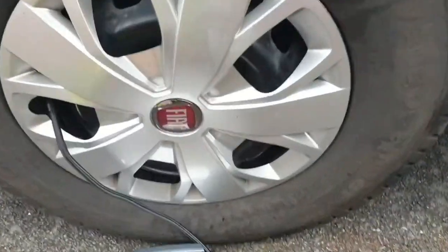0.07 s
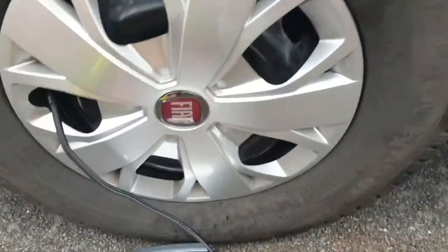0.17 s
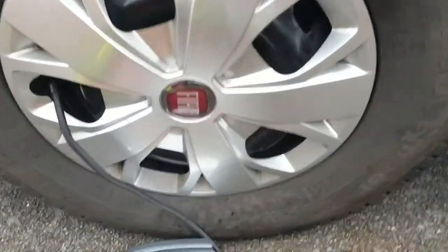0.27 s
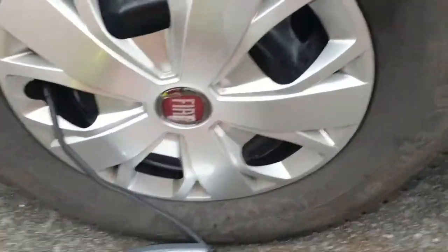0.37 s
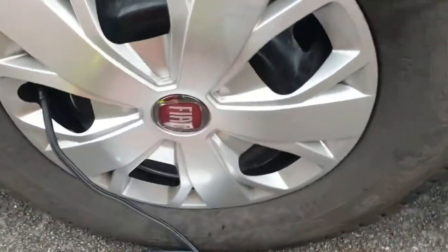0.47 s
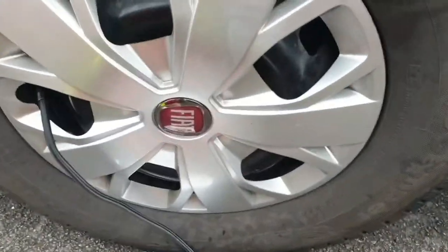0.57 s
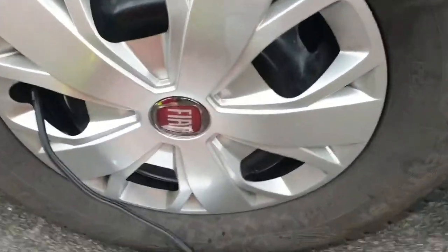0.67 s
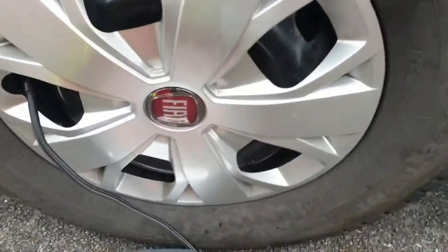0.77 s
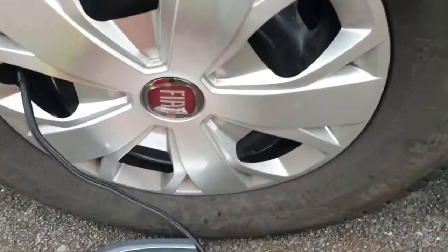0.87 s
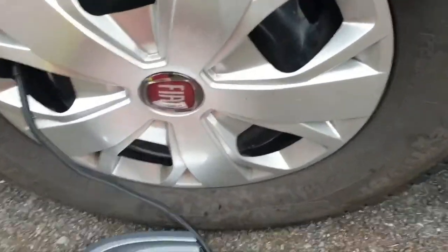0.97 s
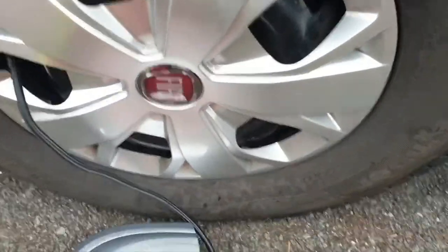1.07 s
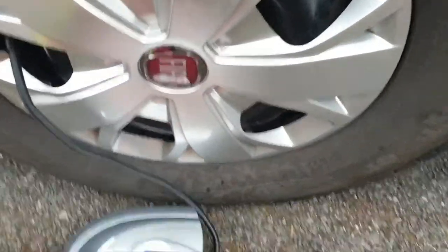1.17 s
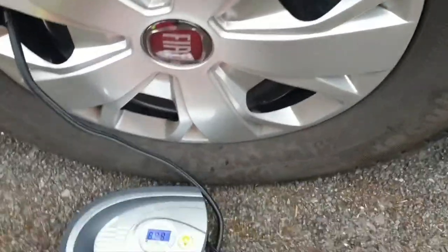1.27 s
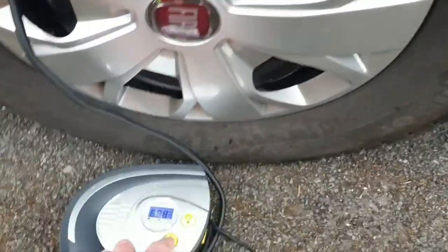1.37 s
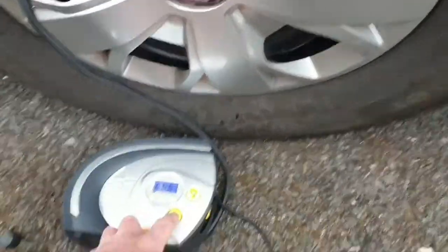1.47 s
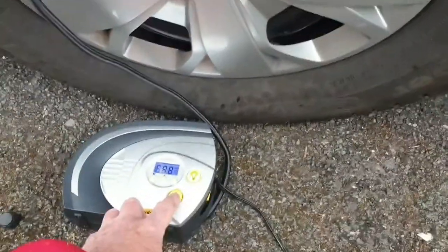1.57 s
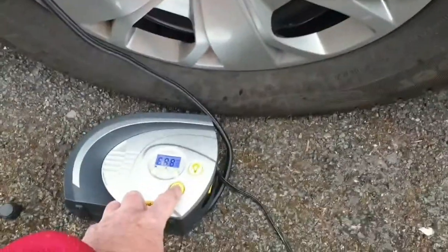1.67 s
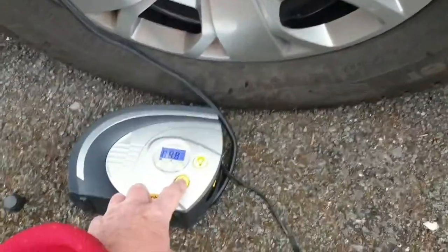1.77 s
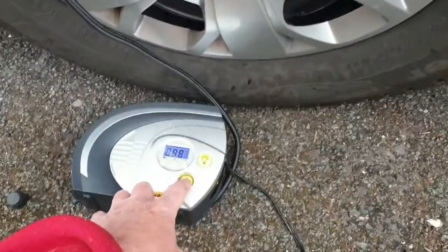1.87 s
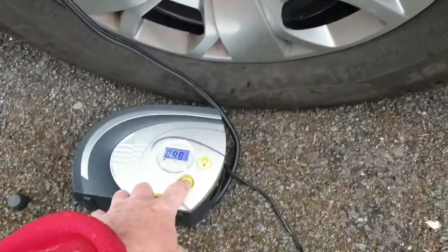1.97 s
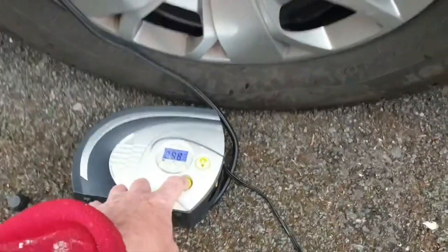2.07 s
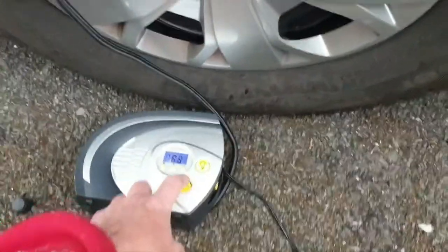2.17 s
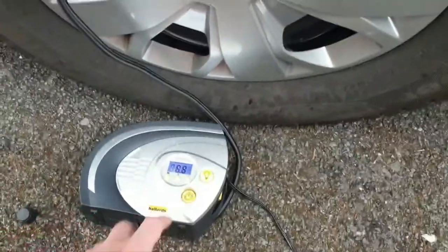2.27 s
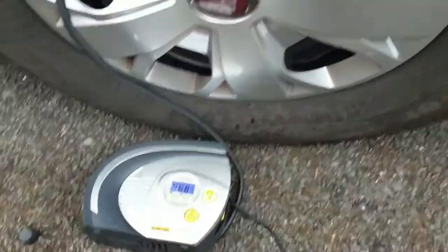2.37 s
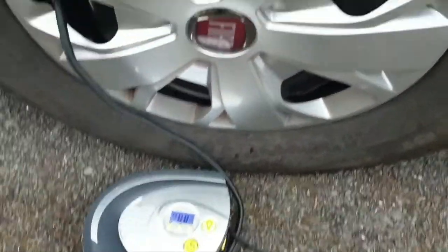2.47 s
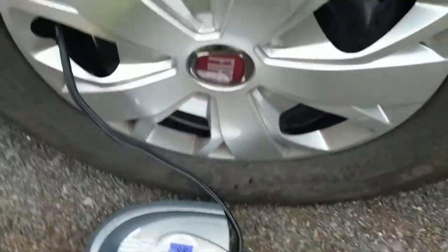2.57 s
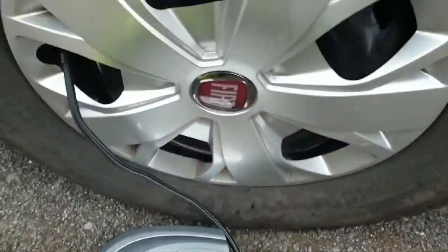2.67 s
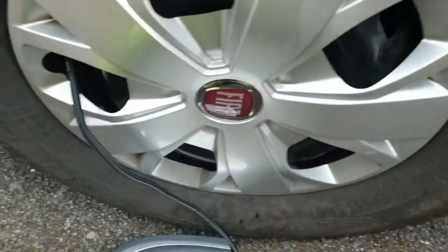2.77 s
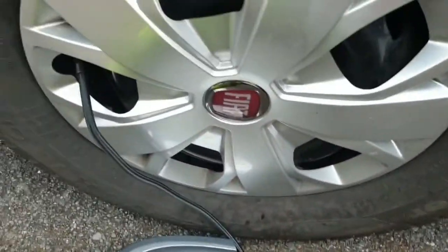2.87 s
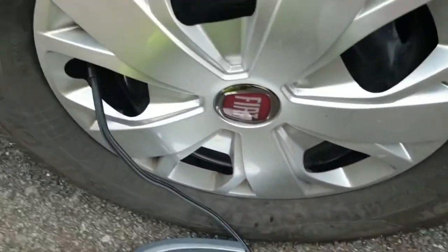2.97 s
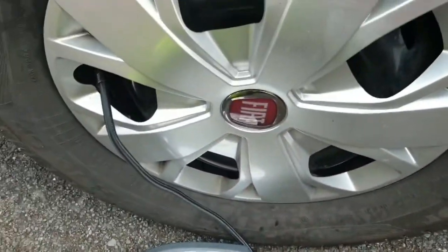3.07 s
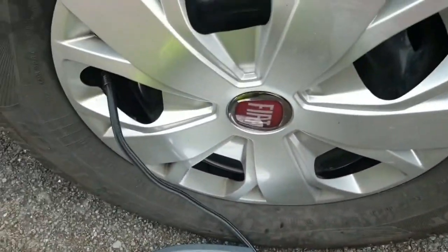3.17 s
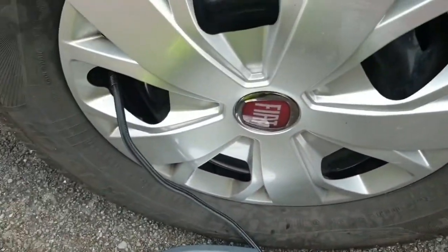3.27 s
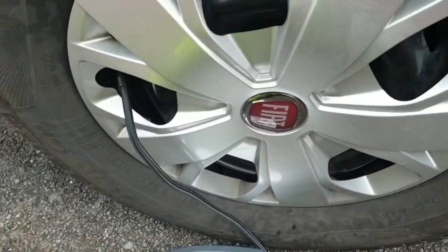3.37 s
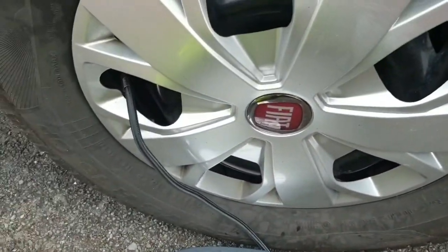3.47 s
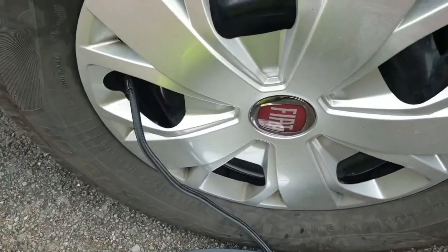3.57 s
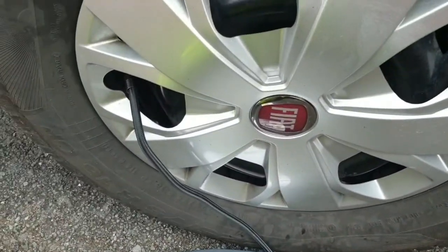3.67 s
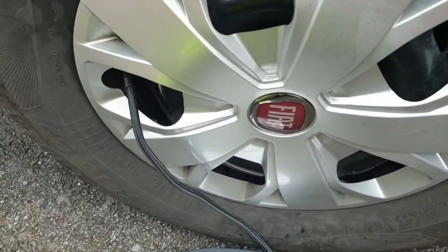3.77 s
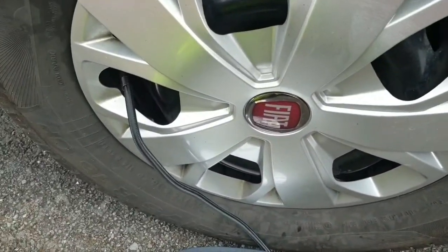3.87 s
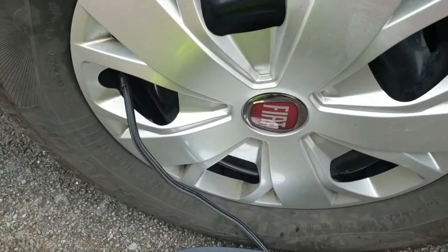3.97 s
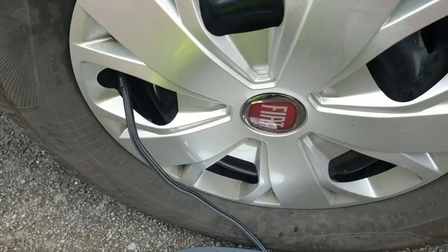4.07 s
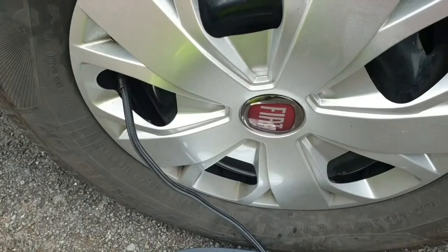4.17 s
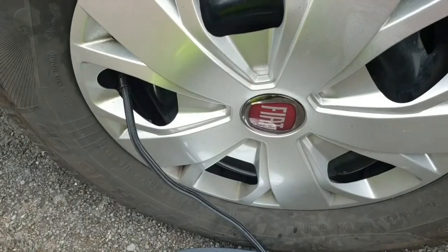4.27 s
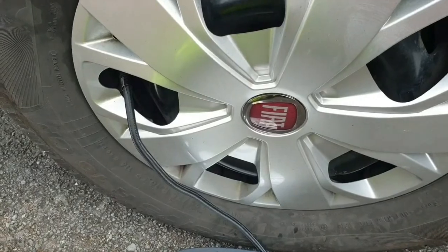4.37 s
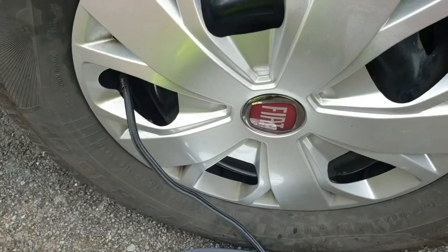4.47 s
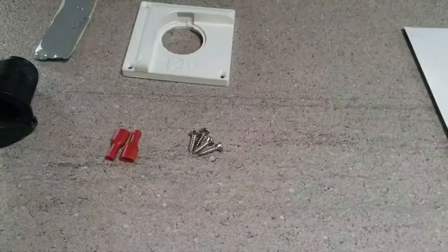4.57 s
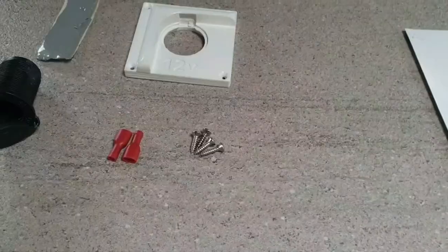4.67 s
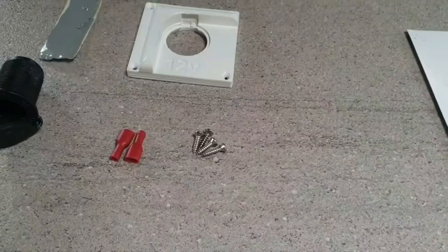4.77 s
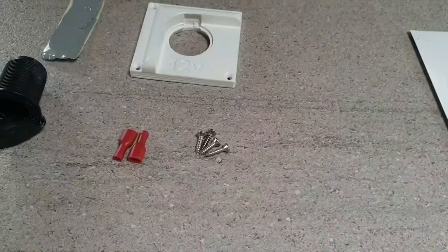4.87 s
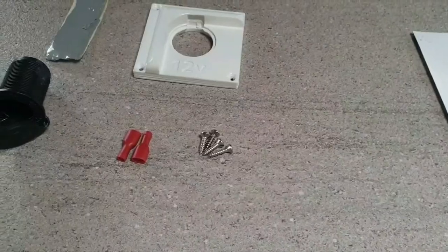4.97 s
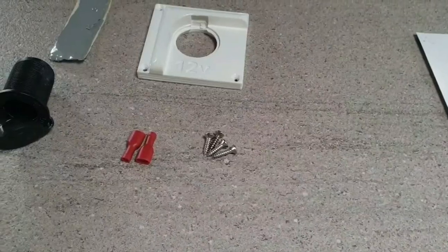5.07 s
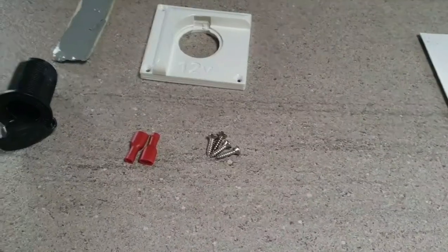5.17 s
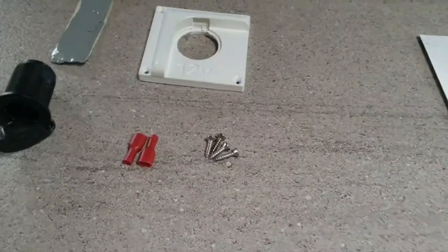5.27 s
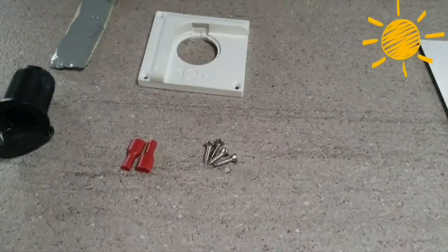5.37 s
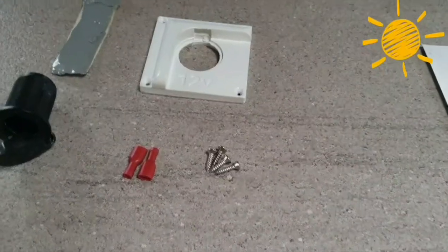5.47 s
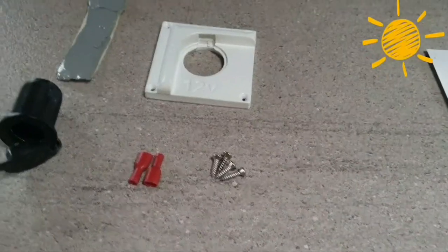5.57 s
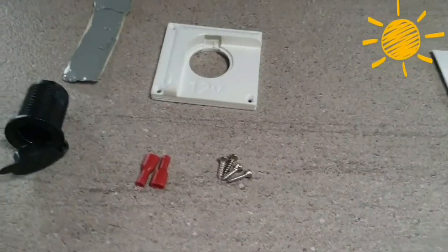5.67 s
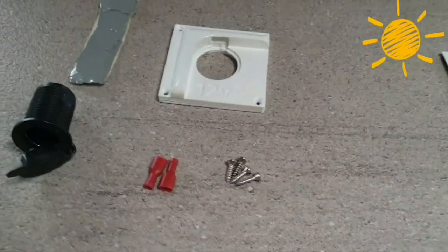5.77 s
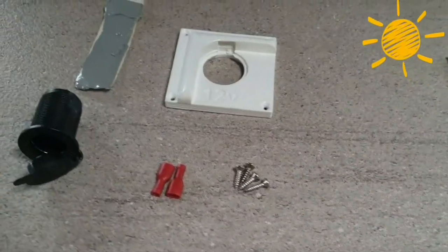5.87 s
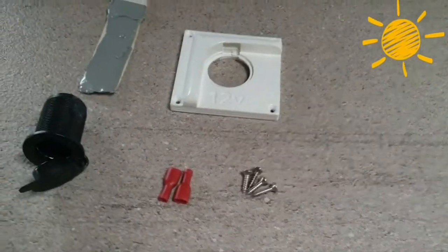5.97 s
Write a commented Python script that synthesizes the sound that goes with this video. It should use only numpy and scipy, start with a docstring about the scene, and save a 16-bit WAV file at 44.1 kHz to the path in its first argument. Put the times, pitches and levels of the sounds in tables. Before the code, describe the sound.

Outdoors, a few soft gritty scuffs on asphalt and dull microphone bumps sit over distant traffic rumble and very faint birds. About two seconds in, a portable tyre inflator starts with hard knocks and quickly reaches a loud, steady, rattling buzz, close to a hand-held stereo microphone. After a little over three seconds it cuts off together with the street sound, leaving faint room hiss.

```python
"""Tyre inflator at the roadside

A small piston inflator on asphalt beside a car wheel, close to a hand-held stereo microphone, with
traffic and faint birds far off. After a few scuffs it is switched on, knocks and runs up to 39 strokes
a second: each turn thumps the plastic case, buzzes the valve and rattles piston, gears and loose parts.
The street sound ends abruptly, leaving only the faint hiss of a quiet room."""
import sys
import numpy as np
from scipy import signal
from scipy.fft import rfft, irfft, next_fast_len
from scipy.io import wavfile
from scipy.ndimage import uniform_filter1d

SR = 44100
rng = np.random.default_rng(int(sys.argv[2]) if len(sys.argv) > 2 else 0)


def bounce(signal):
    """Save signal as a 16-bit WAV file at the path given by the first command-line argument."""
    frames = np.transpose(np.atleast_2d(signal))
    limited = np.clip(frames, -1, 1)
    pcm = np.round(limited * 32767).astype(np.int16)
    wavfile.write(sys.argv[1], SR, pcm)


N = 265041
TIME = np.arange(N) / SR

START_S, STOP_S, FULL_TURNS_PER_S = 2.0852, 5.426, 39
THUMP_DB, CLATTER_DB, GEAR_DB, DB_PER_DOUBLED_SPEED = -22.5, -22, -31, 3.5   # base levels at full speed
STRAIN_S, STRAIN_THUMP_DB, ROCKING_DB = 0.55, 3.5, -23.5   # the strain of running up dies away
THUMP_SAG_DB_PER_S, RATTLE_WANDER_DB = 1.02, 0.94
SCUFF_ATTACK_S, SCUFF_RELEASE_S, SCUFF_TAIL_DB, SCUFF_TAIL_S = 0.014, 0.044, -15, 0.28
TRAFFIC_DB, TRAFFIC_FADE_DB_PER_S, HUM_DB, HUM_FADE_DB_PER_S = -42.5, 1.43, -46, 11
ROOM_DB, ROOM_FADE_DB_PER_S, FLUTTER_S = -60, 6, 0.014
PEAK_LIMIT, CUTOFF_HZ = 1.05, 14600

# speed of the crank: time_s, turns_per_s
CRANK_SPEED = [(2.085, 21.69), (2.14, 31.73), (2.2, 35.82), (2.3, 38.71), (2.5, 38.7), (3.0, 39.02),
               (3.9, 38.81), (4.4, 38.89), (4.9, 38.63), (5.43, 38.93)]
# modes of case and feet, rung by each stroke: pitch_hz, width_hz, gain_db, polarity
CASE_MODES = [(79.6, 33, -10.5, -1), (169.3, 78, 0.5, -1), (267, 18, -2.5, -1), (309.9, 6.7, 2.5, 1),
              (376, 18, -4, 1), (437.2, 15, 4, 1), (528.3, 28, 5, 1), (581.6, 22, 0, -1),
              (735.7, 16, 2.5, -1), (819, 13.3, -10.5, 1), (1140, 17, -4.5, 1)]
# modes of the case rocking on its feet: pitch_hz, width_hz, gain_db
ROCKING_MODES = [(358, 50, 1), (421, 13, 13), (547, 23, -9), (734, 32, -2)]
# contacts within one turn of the crank: place_turns, half_length_turns, gain_db
VALVE_CONTACTS = [(.85, 0.11, -4), (.14, 0.037, -3.5), (0, 0.037, -21.5), (.57, 0.15, -6),
                  (0.6, 0.098, -11.5)]
PISTON_CONTACTS = [(.06, 0.045, 0.5), (0.152, 0.015, -2), (.41, .05, -0.5), (0.549, 0.052, -5)]
GEAR_CONTACTS = [(0.069, 0.02, 1.5), (.43, 0.057, -1), (.59, .04, -16), (.68, 0.053, 0)]
# resonances of valve, shell and gears: pitch_hz, width_hz, gain_db
VALVE_MODES = [(2420, 90, -9.5), (2413, 62, -0.5), (2550, 90, -11.5), (2570, 64, 6.5)]
SHELL_MODES = [(1023, 40, -10), (1196, 31, 6.5), (1528, 84, -0.5), (1850, 180, -3.5), (2815, 150, -2.5),
               (3216, 390, 1), (7416, 286, 5.5), (9640, 1200, -4), (13920, 220, -6.5)]
GEAR_MODES = [(4384, 70, 11.5), (4690, 230, 9), (5010, 280, 2.5), (5260, 69, -2), (5940, 160, 1),
              (6460, 410, 5), (6950, 400, -15)]
# how strongly the valve rings: time_s, level_db
VALVE_LEVELS = [(2.1, -24.5), (2.13, -26), (2.25, -23.5), (2.62, -27), (2.65, -21), (2.76, -26.5),
                (2.86, -22), (3.23, -26), (3.97, -26), (4.15, -30), (4.69, -27.5), (5.38, -27)]
# spectrum of the piston clatter: frequency_hz, density_db
CLATTER_SPECTRUM = [(60, -17), (200, -8.5), (450, 3), (880, -0.5), (1400, -5), (2000, -2.5), (2800, -7.5),
                    (3800, -9), (5000, -1.5), (6000, -12), (7700, -12.5), (8900, -21), (10500, -13),
                    (14500, -24.5)]
# parts that buzz once a turn: start_s, end_s, place_turns, half_length_turns, pitch_hz, width_hz, level_db
LOOSE_BUZZES = [(2.093, 2.616, 0.07, 0.2, 3290, 120, -32), (2.1, 2.454, 0.43, 0.17, 962, 50, -30.5),
                (2.152, 2.544, 0.34, 0.09, 5060, 150, -44), (2.54, 2.68, 0.06, 0.088, 7300, 2500, -35.5),
                (2.8, 4.068, 0.23, 0.15, 2980, 350, -31.5), (3.973, 4.113, 0.56, .3, 6520, 200, -33),
                (4.056, 4.885, 0.55, 0.096, 4400, 250, -32), (4.06, 4.9, 0.34, 0.27, 1180, 150, -35),
                (4.06, 5.5, 0.05, 0.035, 4910, 400, -34), (4.075, 5.5, 0.8, 0.16, 5293, 160, -31.5),
                (4.656, 5.5, 0.06, 0.07, 7250, 600, -37), (4.5, 5.37, 0.71, 0.08, 2434, 90, -29.5)]
# knocks at switch-on: start_s, level_db, decay_s
START_JOLTS = [(2.0473, -26.5, 0.053), (2.05, -18.5, .003), (2.076, -24.5, 0.0098), (2.0877, -12.5, 0.003),
               (2.104, -16.5, 0.013), (2.1232, -8.5, 0.0012), (2.1261, -8.5, 0.0075), (2.136, -15, 0.0047)]
# spectrum of those knocks: frequency_hz, density_db
JOLT_SPECTRUM = [(100, -23), (400, 10.5), (1000, 1.0), (1600, 0.5), (2400, 2), (3800, -6),
                 (7500, -11.5), (14000, -20.5)]
# where the pump lies for the hand-held microphone: time_s, left_minus_right_db
PUMP_BEARING = [(2.15, 1.2), (4.0, 1), (4.2, 1.9), (5.4, 1.5)]
# colour of the two microphone ports: frequency_hz, left_minus_right_db
MIC_PORTS = [(80, 0), (300, 2.5), (750, -2.5), (1700, 3.5), (2400, -1), (3200, 3), (3900, -6.5), (4350, 3),
             (4900, -2.5), (5400, 7.5), (6100, -1), (8000, 3.5), (10800, -3.5), (14500, -6.5)]
# likeness of left and right: frequency_hz, correlation
MIC_LIKENESS = [(35, 0.97), (90, 0.64), (250, 1), (600, 0.58), (1200, 0.43), (2400, 0.2), (4000, 0.15),
                (7000, 0.075), (14000, 0.011)]
# gritty scuffs: start_s, length_s, body_db, hiss_db
GRIT_SCUFFS = [(0.0, 0.18, -54, -48), (0.165, 0.042, -55.5, -45), (0.241, 0.14, -46, -45.5),
               (0.418, 0.014, -43.5, -39), (0.519, 0.05, -50.5, -49.5), (0.673, 0.063, -55.5, -59)]
# spectra of a scuff's body and hiss: frequency_hz, density_db
SCUFF_BODY_SPECTRUM = [(300, -11.5), (600, 0), (1000, 0), (1600, -2.5), (2200, -9.5), (4000, -29.5)]
SCUFF_HISS_SPECTRUM = [(1000, -11.5), (2500, -1.5), (5000, -2), (7400, 1), (8800, -4.5), (14500, -3)]
# handling ticks: start_s, level_db, pitch_hz, width_hz
HANDLING_TICKS = [(1.033, -54.5, 8000, 7000), (1.702, -60, 1700, 1800)]
# dull bumps on the microphone: start_s, level_db, pitch_hz
MIC_BUMPS = [(0.709, -25, 101), (0.829, -28, 68), (1.336, -35, 60)]
# spectra of distant traffic and of the quiet room: frequency_hz, density_db
TRAFFIC_SPECTRUM = [(20, -47.5), (38, 1), (60, 0), (110, -3), (190, -12), (275, -6), (380, -14), (500, -17),
                    (850, -26.5), (2000, -40.5), (4500, -51), (7200, -43), (8800, -54), (14000, -47.5)]
ROOM_SPECTRUM = [(18, -57), (30, -16), (63, -7.5), (446, -13), (1040, -8.5), (1130, -15), (1250, -7),
                 (1530, -18), (3070, -12), (3580, -16), (4400, -31), (7550, -25), (9520, -37.5),
                 (14000, -23.5)]
# low hums of the street: pitch_hz, width_hz, gain_db
STREET_HUMS = [(264, 61, -1.5), (414, 40, -2)]
# far bird calls: start_s, length_s, start_hz, end_hz, level_db
BIRD_CALLS = [(1.167, 0.12, 3500, 3200, -73), (1.17, 0.1, 6700, 6300, -72), (1.5, .1, 6500, 6130, -71),
              (1.817, .06, 7050, 7100, -64), (1.868, 0.048, 4730, 5070, -68),
              (2.03, 0.023, 5100, 4600, -65)]
# treble swells in the room: peak_s, level_db
ROOM_FLUTTERS = [(5.48, -56), (5.55, -54), (5.607, -53.5), (5.68, -57.5), (5.75, -60.5), (5.84, -57),
                 (5.915, -57.5)]
# spectrum of those swells: frequency_hz, density_db
FLUTTER_SPECTRUM = [(1800, -23), (2800, 1), (3400, 4), (4300, -40)]


def inflator():
    """The pump, close up: one crank drives every part; thump, clatter and gears grow with its speed."""
    speed = in_time(CRANK_SPEED)
    turns = np.cumsum(speed) / SR
    turns -= np.interp(START_S, TIME, turns)   # counted from the first stroke
    run_s = np.maximum(TIME - START_S, 0)
    strain = np.exp(-run_s / STRAIN_S)
    speed_db = DB_PER_DOUBLED_SPEED * np.log2(speed / FULL_TURNS_PER_S)
    thump_db = THUMP_DB + speed_db + STRAIN_THUMP_DB * strain - THUMP_SAG_DB_PER_S * run_s
    rattle_db = speed_db + RATTLE_WANDER_DB * drift(per_s=6.0)
    thump = from_db(thump_db) * case_thumps(turns)
    buzz = valve(turns, speed)
    clatter, rocking = piston(turns)
    clatter = from_db(CLATTER_DB + rattle_db) * clatter
    rocking = from_db(ROCKING_DB) * strain * rocking
    rattle = from_db(GEAR_DB + rattle_db) * gears(turns)
    running = np.interp(TIME, [START_S - .006, START_S], [0, 1])
    pump = running * (thump + buzz + clatter + rocking + rattle + loose_parts(turns)) + jolts()
    sides = np.array([[.5], [-.5]])
    at_mic = filtered(pump, from_db(over_bins(MIC_PORTS) * sides))
    return at_mic * from_db(in_time(PUMP_BEARING) * sides)


def case_thumps(turns, lead_s=0.00161, jitter_s=0.00004, uneven_db=0.6):
    """Each compression stroke kicks the case and lets out a short puff."""
    strokes = np.arange(np.ceil(turns[0]), np.floor(turns[-1]))
    timing, force = rng.standard_normal((len(strokes), 2)).T
    stroke_s = np.interp(strokes, turns, TIME) - lead_s + jitter_s * timing
    kicks = np.zeros(N)
    kicks[np.clip(stroke_s * SR, 0, N - 1).astype(int)] = from_db(uneven_db * force) * (strokes >= 0)
    ring = sum(np.sign(sign) * resonate(kicks, hz, width, db) for hz, width, db, sign in CASE_MODES)
    puff = resonate(kicks, hz=620, width_hz=470, db=-19.5)
    thumps = ring + puff
    return thumps / np.std(thumps[turns > 0])


def valve(turns, speed):
    """Bursts of tiny impacts ring the valve while its reed sings."""
    buzz = contacts(turns, VALVE_CONTACTS, between_db=-3.5, uneven_db=5.5, grain_db=-4.0, repeat=0.15)
    ring = steadied(resonate(body(buzz, VALVE_MODES), hz=2285, width_hz=490), amount=0.74)
    return from_db(in_time(VALVE_LEVELS)) * (from_db(-2) * ring + from_db(-1) * reed(turns, speed))


def reed(turns, speed, hz=2368, scatter_hz=55, slip_rad=0.72, uneven_db=2.0):
    """The valve reed sings in bursts, higher with speed, each starting a little differently."""
    sides_rad = np.array([[.45], [-.45]])
    song = 0
    for place, length, db in VALVE_CONTACTS:
        nearest = np.round(turns - place).astype(int)
        offset = turns - place - nearest
        detune, start, force = rng.standard_normal((512, 3))[nearest].T
        pitch_hz = hz * (speed / FULL_TURNS_PER_S) ** .25 + scatter_hz * detune
        phase = 2 * np.pi * pitch_hz * offset / speed + slip_rad * start
        burst = from_db(db + uneven_db * force) * np.exp(-(offset / length) ** 2 / 2)
        song += burst * np.sin(phase + sides_rad)
    return rms_one(song)


def piston(turns):
    """Piston knocks clatter through the shell and rock the case on its feet; returns both sounds."""
    knocks = contacts(turns, PISTON_CONTACTS, between_db=-5.0, uneven_db=5.0, grain_db=4.5, repeat=0.22)
    clatter = colour(knocks + body(knocks, SHELL_MODES), CLATTER_SPECTRUM)
    rocking = steadied(body(knocks, ROCKING_MODES), amount=1.0)
    return clatter, rocking


def gears(turns):
    """Teeth knock together and ring the gears in the treble."""
    teeth = contacts(turns, GEAR_CONTACTS, between_db=-14.5, uneven_db=3.5, grain_db=-4.0, repeat=0.13)
    return steadied(resonate(body(teeth, GEAR_MODES), hz=4600, width_hz=3480), amount=0.28)


def contacts(turns, table, between_db, uneven_db, grain_db, repeat):
    """Bursts of tiny impacts at set places in each turn; a share repeats from turn to turn."""
    power = from_db(between_db) ** 2
    for place, length, db in table:
        nearest = np.round(turns - place).astype(int)
        force = from_db(db + uneven_db * rng.uniform(-3.1, 1, 512))[nearest]
        power += force ** 2 * np.exp(-((turns - place - nearest) / length) ** 2)
    turn_samples = SR // FULL_TURNS_PER_S
    surfaces = rng.standard_normal((2, 2, turn_samples))[..., (turns % 1 * turn_samples).astype(int)]
    bedding = 2 * np.pi * 0.398 * TIME   # the contact pattern slowly changes as the parts bed in
    pattern = surfaces[0] * np.cos(bedding) + surfaces[1] * np.sin(bedding)
    grains = rms_one(rng.standard_normal((2, N)) * from_db(grain_db * drift(per_s=2500)))
    return spread(np.sqrt(power) * (np.sqrt(repeat) * pattern + np.sqrt(1 - repeat) * grains))


def loose_parts(turns):
    """For a while, each part rings at its own pitch when the crank shakes it."""
    buzzes = 0
    for start_s, end_s, place, length, hz, width, db in LOOSE_BUZZES:
        offset = (turns - place + .5) % 1 - .5
        shake = np.exp(-(offset / length) ** 2 / 2) * rng.standard_normal((2, N))
        ring = resonate(resonate(shake, hz, width), hz, 4 * width)
        active = np.clip(np.minimum(TIME - start_s, end_s - TIME) / 0.02 + .5, 0, 1)
        buzzes += from_db(db) * active * steadied(ring, amount=0.17)
    return buzzes


def jolts():
    """Hard knocks through the whole shell as the motor takes up the slack."""
    force = sum(from_db(db) * (TIME >= start_s) * np.exp(-since(start_s) / decay_s)
                for start_s, db, decay_s in START_JOLTS)
    return force * air(JOLT_SPECTRUM)


def scuffs():
    """Each scuff rises, holds and settles: a dull body and a bright hiss, both broken up by grit."""
    body_power = hiss_power = 0
    for start_s, length_s, body_db, hiss_db in GRIT_SCUFFS:
        after_s = since(start_s + length_s)
        attack = np.clip(1 + (TIME - start_s) / SCUFF_ATTACK_S, 0, 1)
        settling = from_db(SCUFF_TAIL_DB) * np.exp(-after_s / SCUFF_TAIL_S)
        shape = attack * np.maximum(np.exp(-after_s / SCUFF_RELEASE_S), settling)
        body_power += (from_db(body_db) * shape) ** 2
        hiss_power += (from_db(hiss_db) * shape) ** 2
    grit = from_db(0.99 * drift(per_s=149.6))
    dull = np.sqrt(body_power) * air(SCUFF_BODY_SPECTRUM)
    hiss = np.sqrt(hiss_power) * air(SCUFF_HISS_SPECTRUM)
    return grit * (dull + hiss)


def ticks(decay_s=0.0056):
    """Small handling ticks, each a short burst of noise in one resonance."""
    white = spread(rng.standard_normal((2, N)))
    clicks = 0
    for start_s, db, hz, width in HANDLING_TICKS:
        shape = (TIME > start_s) * np.exp(-since(start_s) / decay_s)
        clicks += from_db(db) * shape * rms_one(resonate(white, hz, width))
    return clicks


def mic_bumps(decay_s=0.0224):
    """Bumps on the microphone, each a damped low tone, heavier on the left."""
    thuds = 0
    for start_s, db, hz in MIC_BUMPS:
        age_s = since(start_s)
        thuds += from_db(db) * np.sin(2 * np.pi * hz * age_s) * np.exp(-age_s / decay_s)
    return thuds * from_db([[4], [-8]])


def traffic():
    """Distant traffic rumble and the low hum of the street, both growing quieter."""
    rumble = from_db(TRAFFIC_DB - TRAFFIC_FADE_DB_PER_S * TIME) * air(TRAFFIC_SPECTRUM)
    hum = rms_one(body(body(rng.standard_normal(N), STREET_HUMS), STREET_HUMS))
    return rumble + from_db(HUM_DB - HUM_FADE_DB_PER_S * TIME) * hum


def birds():
    """Short faint gliding calls, blurred by distance."""
    calls = 0
    for start_s, length_s, start_hz, end_hz, db in BIRD_CALLS:
        along = np.clip((TIME - start_s) / length_s, 0, 1)
        hz = start_hz + (end_hz - start_hz) * along
        blur = drift(per_s=start_hz / 10)
        calls += from_db(db) * np.sin(np.pi * along) * blur * np.sin(2 * np.pi * np.cumsum(hz) / SR)
    return calls


def quiet_room():
    """Faint room tone that sinks away; its treble flutters in short swells."""
    room_db = ROOM_DB - ROOM_FADE_DB_PER_S * since(STOP_S)
    swells = sum(from_db(db) * np.exp(-abs(TIME - peak_s) / FLUTTER_S) for peak_s, db in ROOM_FLUTTERS)
    return from_db(room_db) * air(ROOM_SPECTRUM) + swells * air(FLUTTER_SPECTRUM)


def from_db(db):
    """Decibels to gain."""
    return 10 ** (np.asarray(db) / 20)


def rms_one(x):
    """Scale to unit rms."""
    return x / np.sqrt(np.mean(x ** 2) + 1e-20)


def since(start_s):
    """Seconds since a moment; zero before it."""
    return np.maximum(TIME - start_s, 0)


def in_time(points):
    """A table over time, read at every sample."""
    return np.interp(TIME, *np.transpose(points))


def over_bins(points):
    """A table over log frequency, read at every FFT bin."""
    hz, value = np.transpose(points)
    bin_hz = np.fft.rfftfreq(next_fast_len(N), 1 / SR)
    return np.interp(np.log(bin_hz + 1), np.log(hz), value)


def filtered(x, gain):
    """Apply one gain per FFT bin."""
    size = next_fast_len(N)
    return irfft(rfft(x, size) * gain, size)[..., :N]


def colour(x, spectrum):
    """Shape a signal with a smooth spectrum; rms 1."""
    return rms_one(filtered(x, from_db(over_bins(spectrum))))


def drift(per_s):
    """A random wander through up to 4000 points, holding the last; rms 1."""
    knots = rng.standard_normal(4000)
    return rms_one(np.interp(TIME * per_s, np.arange(len(knots)), knots))


def spread(pair):
    """Two unrelated signals become left and right, alike in the bass and apart in the treble."""
    alike = np.clip(over_bins(MIC_LIKENESS), -.99, .99)
    mid = filtered(pair[0], np.sqrt(1 + alike))
    side = filtered(pair[1], np.sqrt(1 - alike))
    return mid + side * [[1], [-1]]


def air(spectrum):
    """Stereo noise of a given spectrum."""
    return colour(spread(rng.standard_normal((2, N))), spectrum)


def resonate(x, hz, width_hz, db=0):
    """One resonance, with a gain of db at its peak."""
    radius = np.exp(-np.pi * width_hz / SR)
    scale = (1 - radius ** 2) / 2
    poles = [1, -2 * radius * np.cos(2 * np.pi * hz / SR), radius ** 2]
    return from_db(db) * signal.lfilter([scale, 0, -scale], poles, x + 1e-18)


def body(x, modes):
    """Resonances in parallel."""
    return sum(resonate(x, *mode) for mode in modes)


def steadied(x, amount):
    """Even out the level by amount (0-1): the motor gives each turn about the same energy; rms 1."""
    power = uniform_filter1d(np.mean(x ** 2, axis=0), size=SR // FULL_TURNS_PER_S) + 1e-12
    return rms_one(x / power ** (amount / 2))


def scene():
    """Pump and street end at once, with a brief faint tail, and the quiet room follows."""
    pump = inflator()
    street = (traffic() + scuffs() + ticks()) * from_db([[1.5], [-1.5]])   # a little to the left
    after_s = since(STOP_S)
    ending = np.maximum(np.exp(-after_s / 0.00083), from_db(-15.5) * np.exp(-after_s / .011))
    return (pump + street + mic_bumps() + birds()) * ending + (after_s > 0) * quiet_room()


def record(dry):
    """Peaks are rounded and the top treble is cut."""
    rounded = PEAK_LIMIT * np.tanh(dry / PEAK_LIMIT)
    return filtered(rounded, from_db(over_bins([(CUTOFF_HZ - 100, 0), (CUTOFF_HZ + 300, -90)])))


dry = scene()
out = record(dry)
bounce(out)
```